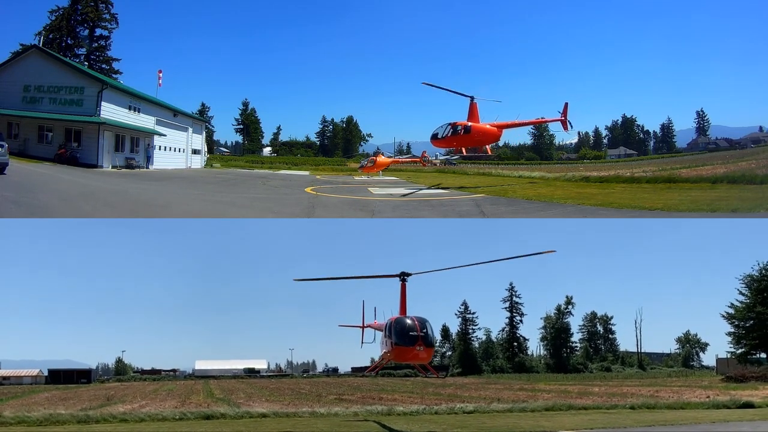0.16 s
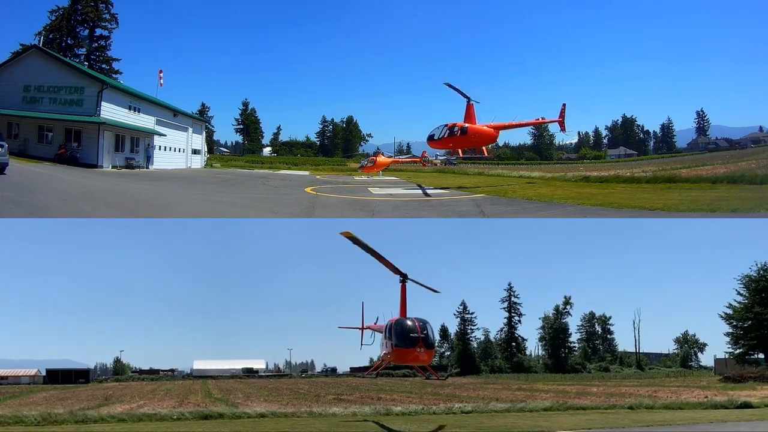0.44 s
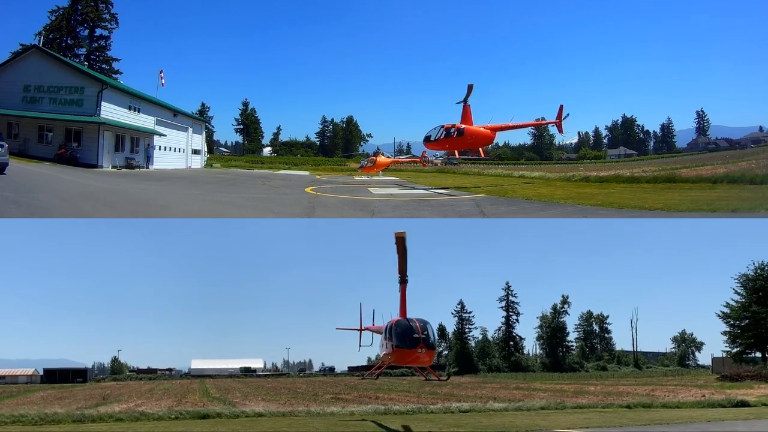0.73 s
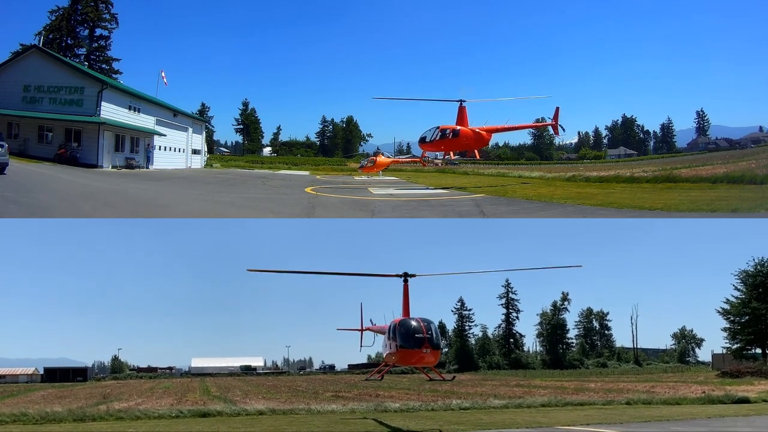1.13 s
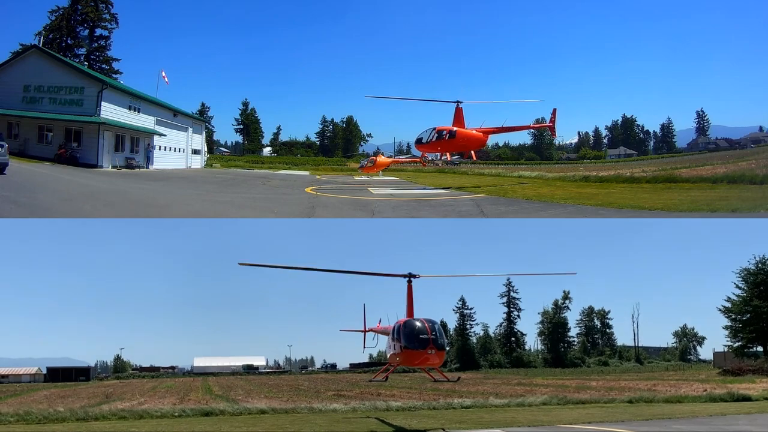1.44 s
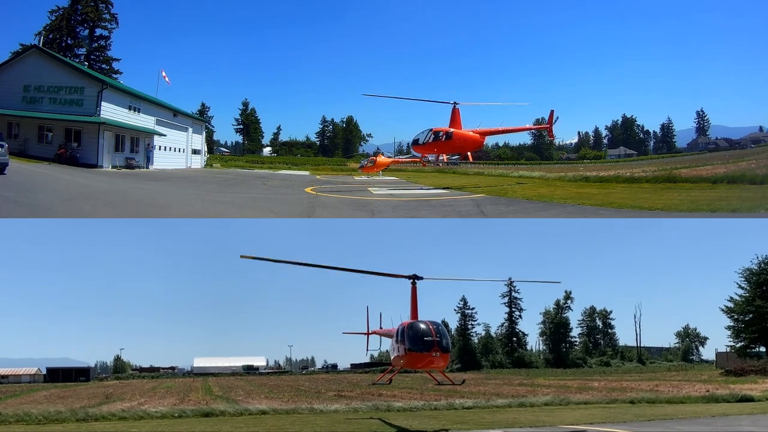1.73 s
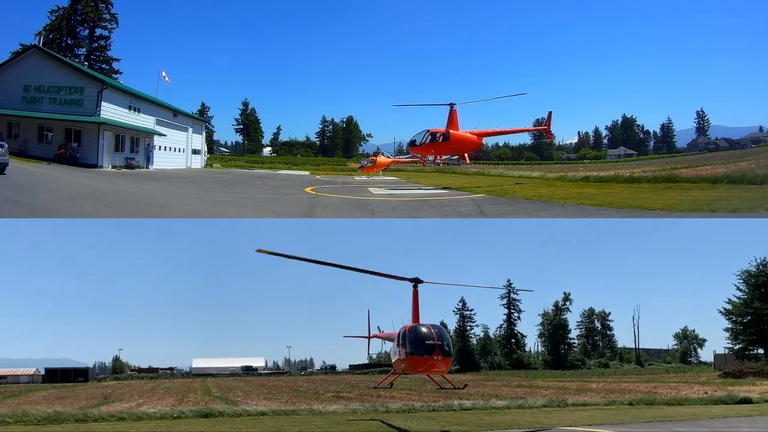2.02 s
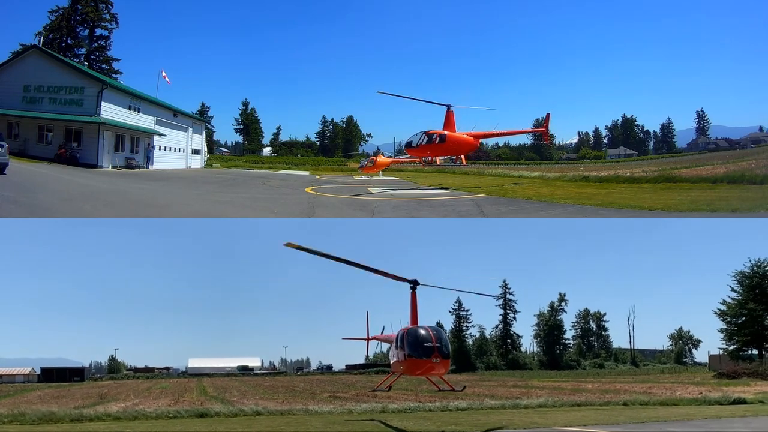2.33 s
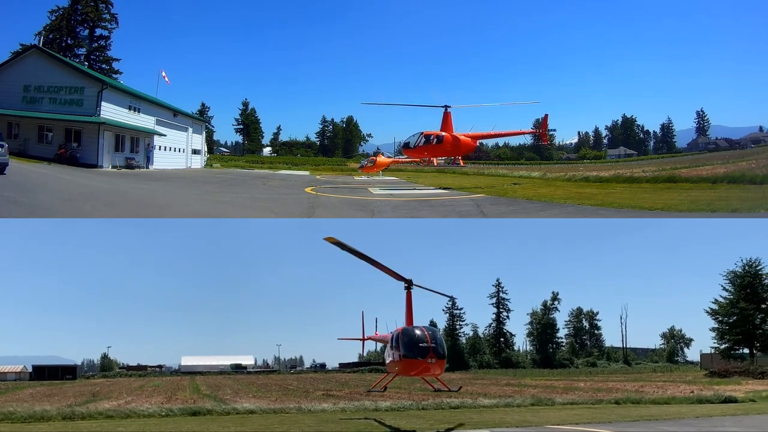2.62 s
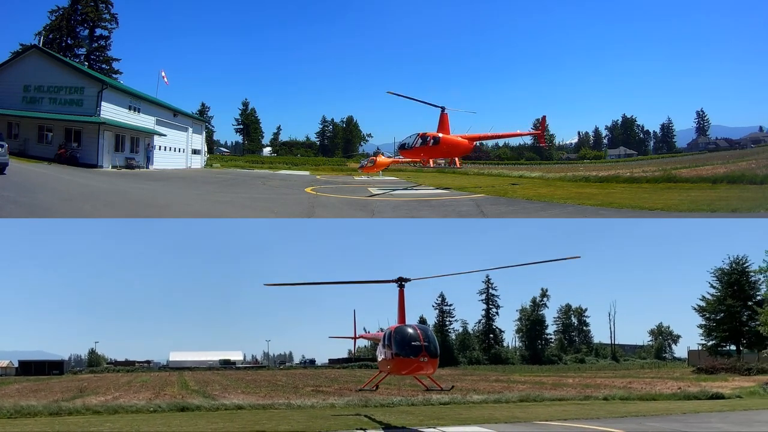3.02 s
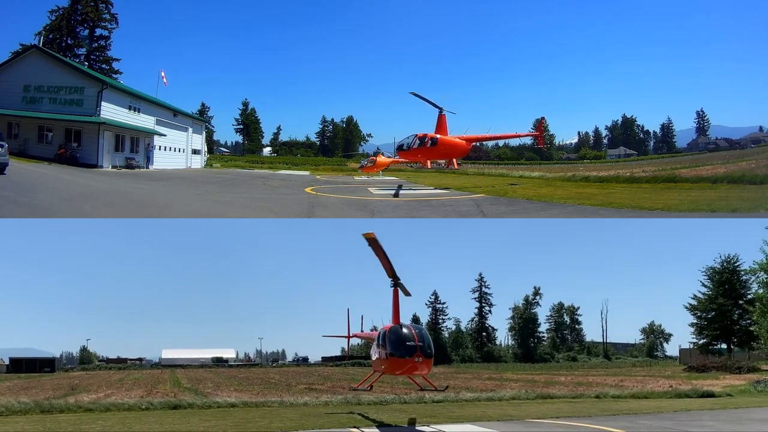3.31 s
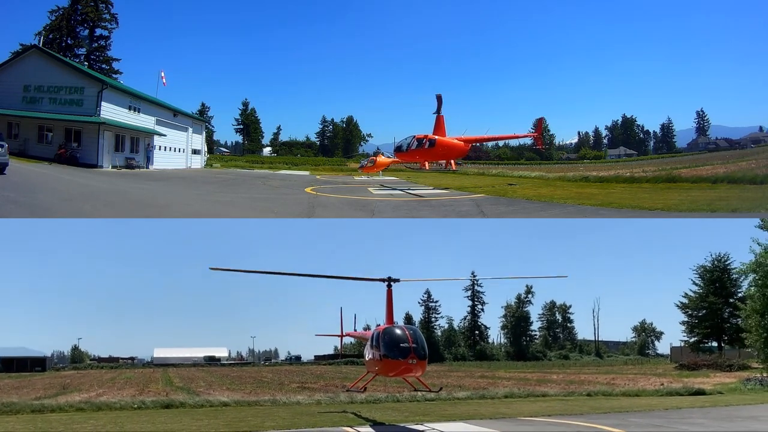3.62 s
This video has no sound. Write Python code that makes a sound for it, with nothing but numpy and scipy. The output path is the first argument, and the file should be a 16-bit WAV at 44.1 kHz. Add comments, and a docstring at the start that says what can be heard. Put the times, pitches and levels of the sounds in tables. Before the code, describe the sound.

Rapid, uneven helicopter rotor slaps run throughout above a low engine roar, close over open tarmac. Wind rumbles on an unprotected stereo microphone, crackling midway, then again just after the hardest slap.

```python
"""A light two-blade piston helicopter hovers low over tarmac, its blades passing nearly fourteen times a second.
From the start each pass slaps (a train of pressure pulses) and swishes (noise bursts) over roar and hum; slap,
swish and roar return off the ground a few milliseconds later. Lumpy noise from the downwash buffets the two
microphone ports: early gusts, a stronger crackling one near 1.6 s, then, after the hardest slap at about 3 s,
another with two crackles."""
import sys
import numpy as np
from scipy import signal
from scipy.fft import rfft, irfft, next_fast_len
from scipy.io import wavfile
from scipy.ndimage import uniform_filter1d, minimum_filter1d, map_coordinates

SR = 44100
rng = np.random.default_rng(int(sys.argv[2]) if len(sys.argv) > 2 else 0)


def to_wav(sig):
    """Store sig (one row per channel, or 1-D mono) as 16-bit WAV at the path in sys.argv[1].

    Samples outside -1..1 are clipped; the rate is SR.
    """
    pcm = np.clip(np.atleast_2d(sig), -1, 1) * 32767
    pcm = np.round(pcm).astype(np.int16)
    wavfile.write(sys.argv[1], SR, pcm.T)  # frames by channels


def gain_from_db(level_db):
    """Convert decibel levels to linear amplitude factors (20 dB per decade)."""
    decades = np.asarray(level_db, float) / 20
    return 10 ** decades


N = 165816  # samples, 3.76 s
t = np.arange(N) / SR

# Blade passes: t/s, relative slap level/dB, relative swish level/dB
BLADE_PASSES = [(0.035, -14, -27.5), (0.106, -8, -25), (0.1806, -9, -26), (0.2531, -11.5, -26.5),
                (0.3271, -14.5, -27), (0.4, -12.5, -27), (0.4742, -7.5, -28.5), (0.5468, -9, -29),
                (0.6207, -9, -31), (0.695, -8.5, -28), (0.7673, -10.5, -29.5), (0.8407, -11, -26),
                (0.9143, -11, -26.5), (0.9873, -15, -27), (1.0618, -13, -29.5), (1.1347, -9, -28),
                (1.2085, -8, -28.5), (1.2811, -7.5, -29), (1.3547, -8, -28), (1.428, -10, -29),
                (1.5006, -4.5, -28), (1.5746, -6, -29), (1.647, -6.5, -31), (1.721, -8.5, -26.5),
                (1.7927, -11.5, -28.5), (1.867, -15, -29), (1.9398, -15, -27.5), (2.0127, -11, -29),
                (2.0852, -17.5, -29.5), (2.1597, -9, -25.5), (2.2324, -10, -26), (2.3062, -8, -29.5),
                (2.3785, -10.5, -28.5), (2.4503, -5.5, -26.5), (2.5238, -7.5, -27.5), (2.598, -10.5, -28.5),
                (2.6705, -10, -29.5), (2.7447, -10.5, -26), (2.816, -7, -26), (2.891, -8, -25.5),
                (2.9655, -1.5, -27.5), (3.0395, -7.5, -25.5), (3.1137, -6, -24.5), (3.1869, -8.5, -29),
                (3.261, -12.5, -28), (3.3341, -9, -26), (3.4064, -7, -26.5), (3.4813, -11, -25.5),
                (3.5554, -13.5, -26.5), (3.6289, -6, -27), (3.703, -5.5, -25.5)]
# Attitude of the aircraft: t/s, extra delay of the ground path/s, ground share (0-1),
# first gap between strikes/s, weight of the late strikes/dB
ATTITUDE = [(0, 0.0033, 0.76, 0.0011, -7), (.7, 0.0031, 0.73, 0.0011, -11.5), (1.3, .0034, 0.6, 0.0013, -4),
            (1.9, 0.0032, 0.56, 0.0017, -10), (2.4, 0.0034, 0.6, .0017, -5.5),
            (2.65, 0.00303, 0.9, 0.00152, -3), (3.1, 0.003, 0.46, 0.0014, -11),
            (3.76, 0.0035, 0.59, 0.0016, -14)]


def unit(x):
    """Scale to rms 1."""
    return x / np.sqrt(np.mean(x ** 2) + 1e-20)


def along(points, hz):
    """Read a curve of (f/Hz, value) points on a log frequency axis."""
    f, value = np.transpose(points)
    return np.interp(np.log(hz + 1), np.log(f + 1), value)


def curves(rows):
    """One value per sample for each column after the time."""
    s, *columns = np.transpose(rows)
    return [np.interp(t, s, column) for column in columns]


def wobble(rate):
    """A smooth random curve, rate knots a second (399 at most)."""
    knots = rng.standard_normal(int(N * 400 / SR) + 4)
    return map_coordinates(knots, [t * min(rate, 399)])


def filtered(x, response):
    """Filter x by a complex response of frequency."""
    m = next_fast_len(N + 8192)
    hz = np.fft.rfftfreq(m, 1 / SR)
    return irfft(rfft(x, m) * response(hz), m)[..., :N]


def noise(spectrum, patchy_db):
    """Two unrelated coloured noises, rms 1 together, sharing patches of random gain in time and frequency."""
    z = signal.stft(rng.standard_normal((2, N)), nperseg=512)[2]
    field = uniform_filter1d(rng.standard_normal(z.shape[1:]), 6, 0)
    field = uniform_filter1d(field, 5, 1)
    pair = signal.istft(z * gain_from_db(patchy_db * unit(field)), nperseg=512)[1][:, :N]
    return unit(filtered(pair, lambda hz: gain_from_db(along(spectrum, hz))))


def crackles():
    """Sharp eddies on the ports: millisecond noise bursts, the same at both."""
    # Eddies: t/s, burst level/dB
    eddies = [(1.427, -20), (1.453, -17.5), (1.561, -15), (1.586, -14), (1.6142, -11.5), (1.650, -13),
              (1.6596, -11), (1.668, -15), (1.6837, -18), (1.7958, -18), (3.0853, -11), (3.102, -15)]
    # Colour of an eddy: f/Hz, relative level/dB per Hz
    eddy_spectrum = [(300, -8), (700, 0), (1500, -3), (3000, -8), (5000, -18), (9000, -70)]
    rise_s, fall_s = 0.0008, 0.0025
    bursts = 0
    for s, db in eddies:
        bursts = bursts + gain_from_db(db) * np.exp(-np.abs(t - s) / np.where(t < s, rise_s, fall_s))
    return bursts * noise(eddy_spectrum, patchy_db=4.5)[0]


def wind():
    """Downwash on the ports: low rumble, buffet and higher flutter in lumps, plus crackling eddies."""
    # Gusts: t/s, rumble level/dB, buffet level/dB, flutter level/dB
    gusts = [(0.0, -37, -28.5, -26), (0.09, -24, -15, -23), (0.18, -33, -25.5, -46),
             (0.21, -14.5, -18.5, -23.5), (0.45, -44, -30, -28), (0.72, -28, -20, -31),
             (0.88, -15, -19, -24), (0.91, -30, -28.5, -27.5), (1.0, -18, -18.5, -27),
             (1.35, -19.5, -20, -34), (1.45, -15.5, -13.5, -16), (1.54, -9, -11.5, -15),
             (1.58, -16, -16, -13.5), (1.67, -16, -14.5, -11), (1.7, -16.5, -18, -20),
             (1.81, -21.5, -11, -17.5), (1.84, -29, -23, -25), (2.07, -24, -17.5, -25.5),
             (2.38, -19, -29.5, -30), (2.81, -20.5, -15, -18), (2.94, -17, -14.5, -17),
             (2.99, -11, -18, -19.5), (3.06, -34, -26, -25.5), (3.09, -15, -13, -10.5),
             (3.15, -10.5, -20, -30), (3.2, -28, -20, -20), (3.33, -13, -26, -28), (3.37, -46, -24, -28),
             (3.41, -14, -14, -21), (3.54, -22, -26, -23), (3.56, -15.5, -27, -24), (3.76, -27, -15, -36)]
    # Colours of the three layers: f/Hz, relative level/dB per Hz
    rumble_spectrum = [(15, -57), (28, -22), (50, 0), (80, -2), (115, -6.5), (200, -52), (800, -110)]
    buffet_spectrum = [(50, -44), (90, -4), (130, -1.5), (200, -6), (300, -8.5), (500, -23), (1500, -71)]
    flutter_spectrum = [(100, -49), (250, -5), (500, 2.5), (800, -6.5), (1400, -9.5), (2500, -24),
                        (4500, -32), (7000, -48), (12000, -110)]
    # Likeness of rumble and buffet at the two ports: t/s, likeness (below 0 when wind pushes across them)
    across = [(0, 0.3), (.6, 0.69), (1.5, 0.37), (2.3, -0.36), (2.75, -0.65), (3.15, 0.28), (3.76, -0.55)]
    # Lumps of each layer: random knots per second, depth/dB before the weights below
    lump_settings = [(14, 2), (25, 3), (200, 4)]

    spectra = rumble_spectrum, buffet_spectrum, flutter_spectrum
    likeness = 2 * curves(across) + [0]  # flutter is unrelated from port to port
    out = 0
    for level_db, spectrum, alike, (rate, lump_db) in zip(curves(gusts), spectra, likeness, lump_settings):
        common, opposed = noise(spectrum, patchy_db=2.5)
        turn = np.arccos(np.clip(alike, -1, 1)) / 2
        pair = np.cos(turn) * common + np.sin(turn) * np.array([opposed, -opposed])
        shared = wobble(rate)
        own = np.array([wobble(rate), wobble(rate)])
        lumps = gain_from_db(lump_db * (0.5 * shared + 0.7 * own))
        out = out + gain_from_db(level_db) * unit(lumps * pair)
    return out + crackles()


def hum():
    """Low orders of rotor, tail rotor and exhaust: sines that waver in level and phase."""
    # Steady tones: f/Hz, starting rms level/dB ahead of the ports, waver/dB, drift/dB per s
    orders = [(54.7, -29.5, -5.5, 0), (68.8, -27.5, 5.5, -4.5), (79.7, -27.5, 2, -0.5),
              (137.4, -25, 3, -3.5)]
    total = 0
    for hz, db, waver_db, drift in orders:
        level = np.sqrt(2) * gain_from_db(db + drift * t + waver_db * wobble(5.04))
        phase = 0.71 * wobble(9) + 2 * np.pi * rng.random()
        total = total + level * np.sin(2 * np.pi * hz * t + phase)
    return total


def engine_roar():
    """Continuous low-heavy engine noise whose level wanders."""
    # Colour of the roar: f/Hz, relative level/dB per Hz
    roar_spectrum = [(40, -4), (100, 3.5), (300, 0), (700, -7.5), (1500, -15), (3000, -19.5), (6000, -23),
                     (12000, -46)]
    level = gain_from_db(-25.5 + 1.3 * wobble(29.62))
    return level * noise(roar_spectrum, patchy_db=2.5)


def pulsing(level_db, rise_s, fall_s):
    """Envelope that swells to each blade pass and falls away; overlapping passes add in power."""
    coarse = t[::16]
    gap = coarse - np.array(BLADE_PASSES)[:, :1]
    shape = np.exp(-np.abs(gap) / np.where(gap < 0, rise_s, fall_s))
    return np.interp(t, coarse, np.sqrt(gain_from_db(level_db) ** 2 @ shape ** 2))


def blade_noise():
    """Trailing-edge swish, turbulent chop and tip crack: noises that peak as a blade comes round."""
    # Colours of the three noises: f/Hz, relative level/dB per Hz
    swish_spectrum = [(1500, 1.5), (3000, -1.5), (5000, -2), (7000, 0.5), (9000, 3), (11000, 3),
                      (15800, -0.5)]
    chop_spectrum = [(150, -62), (300, -3.5), (600, -3.5), (1000, -8), (2000, -13.5), (3500, -32),
                     (6000, -33.5), (12000, -62)]
    crack_spectrum = [(900, -17), (2200, 5.5), (4200, -4.5), (7000, -30)]
    s, slap_db, swish_db = np.transpose(BLADE_PASSES)

    floor = gain_from_db(swish_db.mean() - 9.5)  # swish left between passes
    swish = np.hypot(pulsing(swish_db, rise_s=0.017, fall_s=0.019), floor)
    swish = swish * gain_from_db(0.83 * wobble(90))

    chop_db = slap_db - slap_db.mean() - 29.5 + 1.1 * s  # grows by 1.1 dB per s
    chop = pulsing(chop_db, rise_s=0.013, fall_s=0.033)
    chop = chop * gain_from_db(3 * wobble(150))  # ragged

    crack_db = swish_db - 1 - 1.3 * s  # fades by 1.3 dB per s against the swish
    crack = pulsing(crack_db, rise_s=0.004, fall_s=0.004)

    return (swish * noise(swish_spectrum, patchy_db=0.6)
            + chop * noise(chop_spectrum, patchy_db=0.0)
            + crack * noise(crack_spectrum, patchy_db=5.5))


def slap():
    """Each pass strikes a train of vortices: quick sharp pressure pulses, then wider and slower ones."""
    # Strikes of one train: share of the way from first to last gap, relative level/dB
    strikes = [(0, -13), (0, -6), (0, -8), (0, -3.5), (.2, -5), (.6, 4), (1, -4), (1, -2), (1, -10),
               (1, 0.5)]
    lead_s, last_gap_s = 0.005476, 0.002941  # the train's gaps are counted from lead_s ahead of the pass
    jitter_s, scatter_db = 0.00007, 2.8  # random spread of each gap and each level
    width_share = 0.225  # pulse width over its gap

    s, db, _ = np.transpose(BLADE_PASSES)
    late, strike_db = np.transpose(strikes)
    first_gap, late_db = [c[(s * SR).astype(int), None] for c in curves(ATTITUDE)[2:]]
    gaps = first_gap + np.clip(late, 0, 1) * (last_gap_s - first_gap)
    draw = rng.standard_normal((len(s), 2, len(late)))
    when = s[:, None] - lead_s + np.cumsum(gaps + jitter_s * draw[:, 0], 1)
    size = gain_from_db(db[:, None] + strike_db + late * late_db + scatter_db * draw[:, 1])

    # a peak with a dip on either side, placed between samples
    index = np.round(when * SR).astype(int)[..., None] + np.arange(-160, 161)
    u = (index / SR - when[..., None]) / (width_share * gaps[..., None])
    pulse = size[..., None] * (1 - u ** 2) * np.exp(-u ** 2 / 2)
    return np.bincount(index.ravel(), pulse.ravel(), N + SR)[:N]


def ground(x):
    """Direct sound plus its delayed bounce off rough ground, and a weaker one by way of the hull."""
    delay, share = curves(ATTITUDE)[:2]
    dull = filtered(x, lambda hz: 1 / (1 + 1j * hz / 2420))  # little returns above 2420 Hz

    def delayed(seconds):
        return np.array([np.interp(t - seconds, t, channel) for channel in dull])

    again = 0.18  # share that bounces once more between hull and ground
    return x + share * delayed(delay) + again * share ** 2 * delayed(2 * delay)


def ports(pair):
    """The aircraft at two ports: its noise alike in part, with a phase lead that depends on frequency."""
    # Phase between the ports: f/Hz, lead of the right/rad
    port_phase = [(0, 0), (4500, -1), (6250, 0), (15750, 4 * np.pi)]
    # Likeness of the noise at the ports: f/Hz, likeness (0-1)
    port_alike = [(100, 0.38), (1500, 0.7), (3000, 0.072), (5800, 0.019), (7000, 0.79), (15000, 0.89)]

    def split(hz):
        turn = np.arccos(np.clip(along(port_alike, hz), 0, 1)) / 2
        return np.array([np.cos(turn), np.sin(turn)])

    def phase(hz):
        half_lead = np.interp(hz, *np.transpose(port_phase)) / 2
        return np.exp(1j * np.array([-half_lead, half_lead]))

    common, opposed = filtered(pair, split)
    return filtered(np.array([common + opposed, common - opposed]), phase)


def scene():
    """Wind on the ports, plus the aircraft: hum direct, all else also off the ground."""
    common_only = [[1], [0]]  # slap and hum feed only the part that both ports share
    gusts = wind()
    tones = hum() * common_only
    aircraft = engine_roar() + blade_noise() + slap() * common_only
    return gusts + ports(ground(aircraft) + tones)


def top_cut(x):
    """Nothing passes above the cut-off."""
    return signal.sosfilt(signal.butter(12, 17070, fs=SR, output="sos"), x)


def record(dry):
    """Cut the top above 15.9 kHz, then limit the peaks of both ports together."""
    x = filtered(dry, lambda hz: hz < 15900)
    hold = int(0.012 * SR)  # 12 ms
    need = np.minimum(1, 0.95 / (np.abs(x).max(0) + 1e-9))
    gain = uniform_filter1d(minimum_filter1d(need, hold), hold // 2)
    return top_cut(x * gain)


dry = scene()
out = record(dry)
to_wav(out)
```